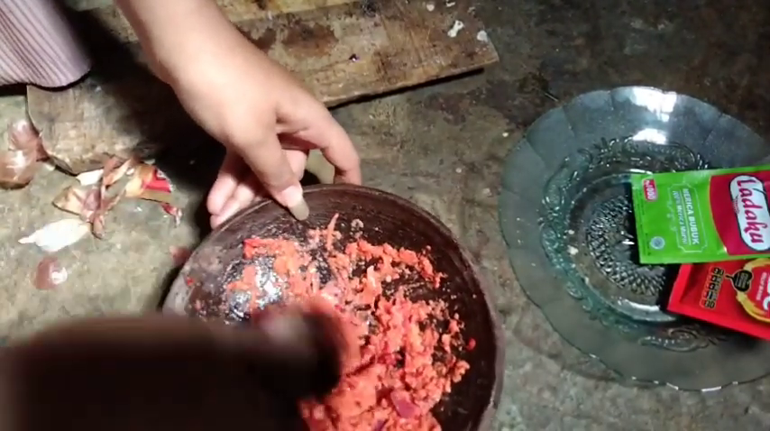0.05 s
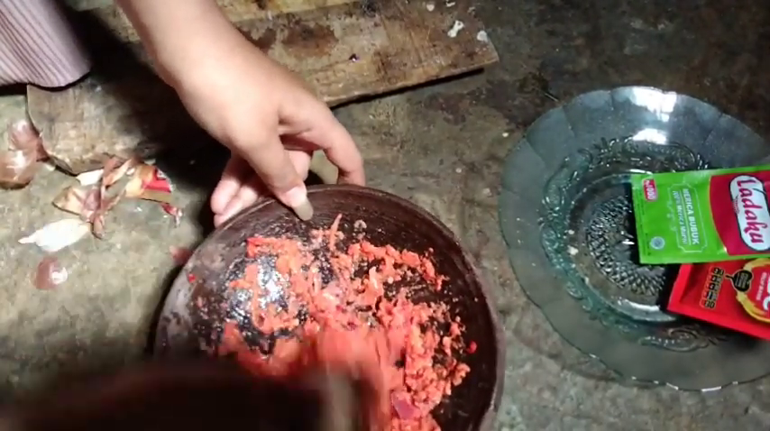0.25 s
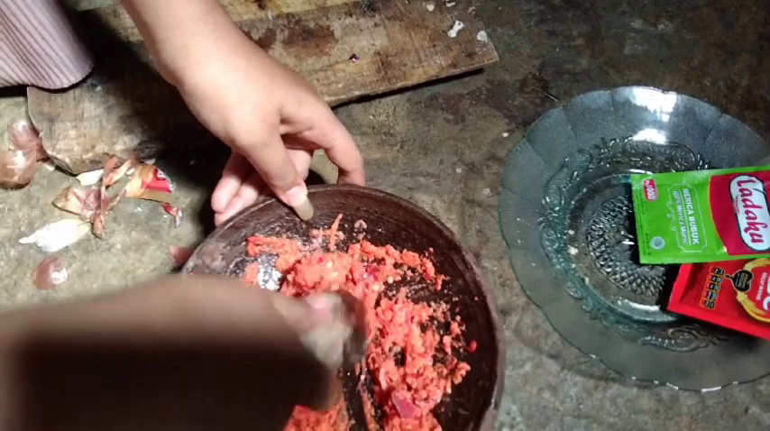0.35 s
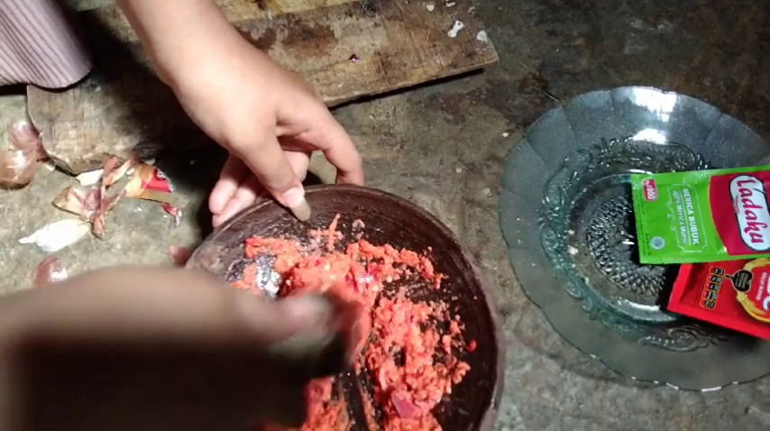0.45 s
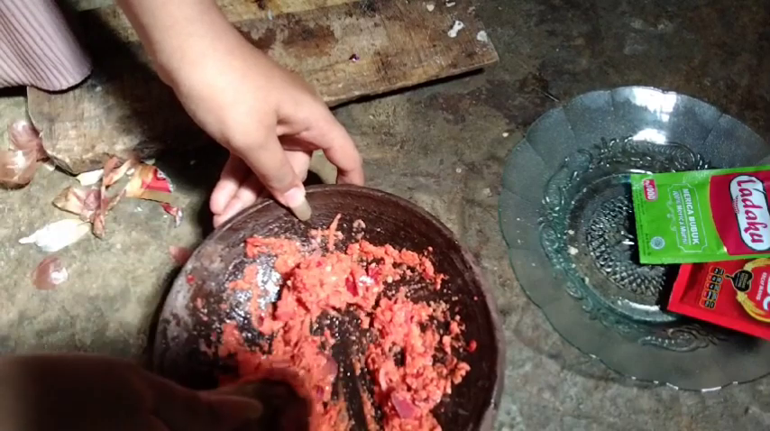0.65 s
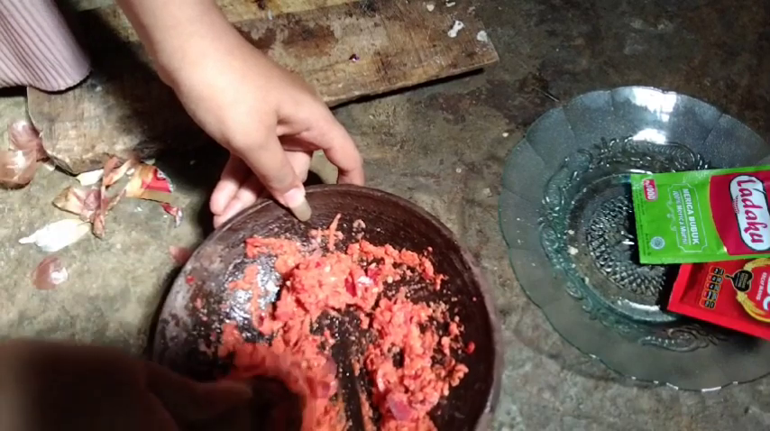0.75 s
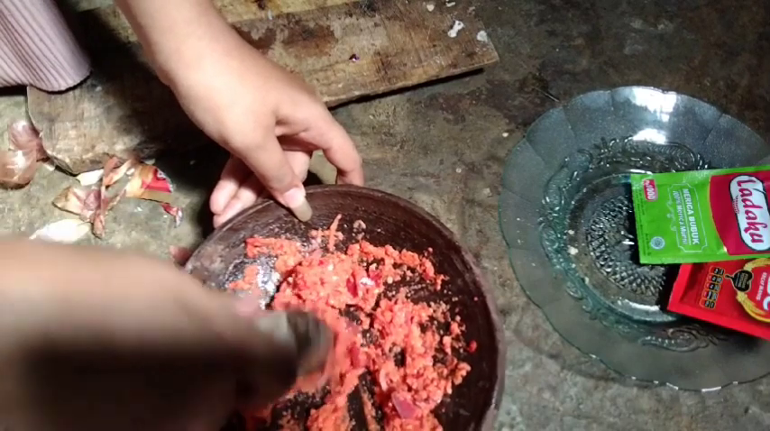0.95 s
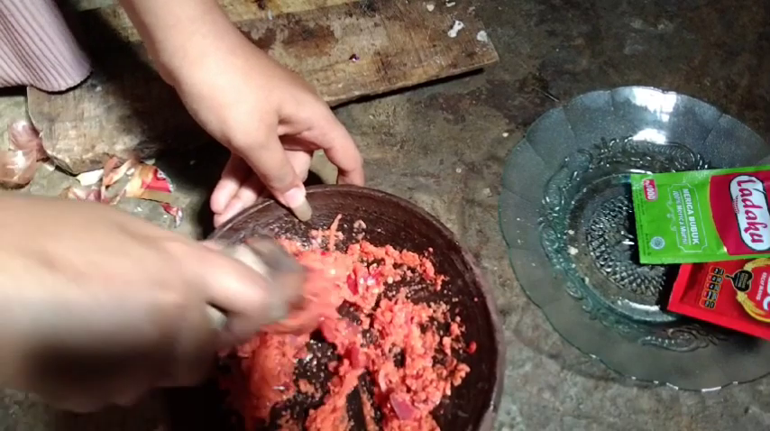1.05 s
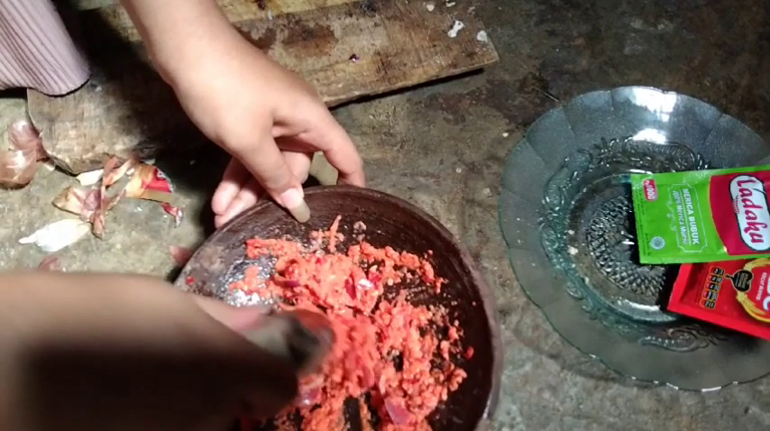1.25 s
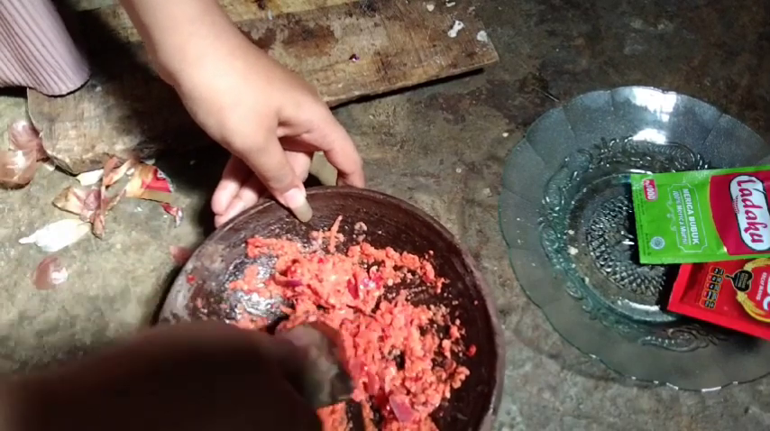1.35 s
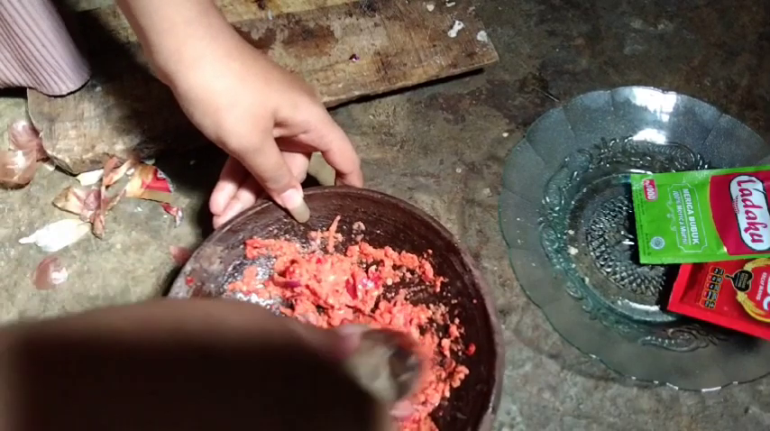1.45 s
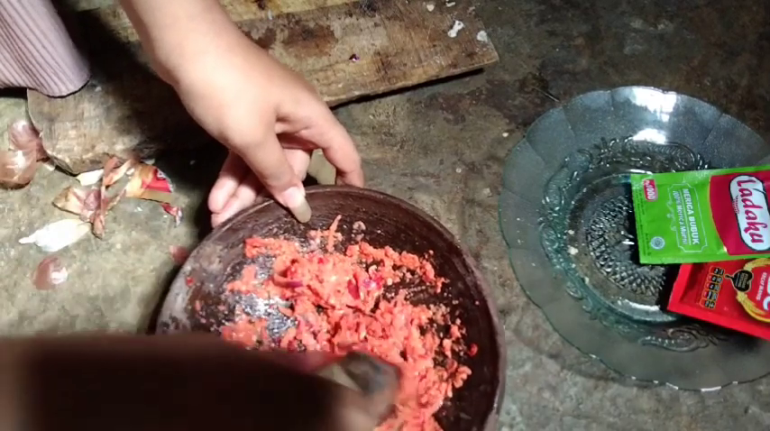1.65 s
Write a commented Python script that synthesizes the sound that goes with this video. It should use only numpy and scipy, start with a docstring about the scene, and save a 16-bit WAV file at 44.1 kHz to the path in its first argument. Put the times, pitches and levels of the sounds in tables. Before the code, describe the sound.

A stone pestle grinds wet chilli paste in a mortar: a small plop and squelch, a quick run of clacks, gritty scraping, then one heavy, dull knock. It is heard close up in a small kitchen.

```python
"""Pestle in wet chilli paste

Close by, a stone pestle squelches into a mortar and an air pocket plops. Stone clacks on the bowl
along the stroke, rubs back over seeds and skins, and lands one heavy blow, dulled by the paste.
Films of juice snap in tiny ticks, the mortar rocks on the kitchen floor with soft low bumps,
and the small hard room answers over a faint rumble."""
import sys
import numpy as np
from scipy import signal
from scipy.fft import rfft, irfft, next_fast_len
from scipy.io import wavfile
from scipy.ndimage import uniform_filter1d

SR = 44100
rng = np.random.default_rng(int(sys.argv[2]) if len(sys.argv) > 2 else 0)


def pcm_store(signal):
    """Save signal as 16-bit PCM."""
    levels = np.round(np.clip(np.atleast_2d(signal), -1, 1) * 32767)
    wavfile.write(sys.argv[1], SR, levels.astype(np.int16).T)


N = 74970
T = np.arange(N) / SR


def amp(db):
    return 10 ** (np.asarray(db) / 20)


def unit_rms(x):
    return x / np.sqrt(np.mean(x ** 2) + 1e-20)


def curve_at(points, hz):
    """Read a curve of (Hz, value) points along a log frequency axis."""
    freqs, values = np.transpose(points)
    return np.interp(np.log(hz + 1), np.log(freqs + 1), values)


def coloured(x, eq):
    """Shape x with an EQ of (Hz, dB) points; minimum phase, so nothing rings ahead of an attack."""
    size = 2 * next_fast_len(len(x))
    gain = amp(curve_at(eq, np.fft.rfftfreq(size, 1 / SR)))
    cepstrum = irfft(np.log(gain), size)
    cepstrum[1:size // 2] *= 2
    cepstrum[size // 2 + 1:] = 0
    return irfft(rfft(x, size) * np.exp(rfft(cepstrum)), size)[:len(x)]


def evened(x, width_hz=350):
    """Flatten the peaks and gaps in the spectrum that are broader than width_hz."""
    size = next_fast_len(len(x))
    power = np.abs(uniform_filter1d(np.abs(rfft(x, size)) ** 2, round(width_hz * size / SR)))
    gain_db = -10 * np.log10(power / power.mean())
    return coloured(x, np.transpose([np.fft.rfftfreq(size, 1 / SR), gain_db]))


def at(start, x):
    """Delay x to its start in seconds."""
    return np.pad(x, (max(round(start * SR), 0), 0))[:N]


def ping(hz, rise_s):
    """A heavily damped mode that swells for rise_s and dies within a few cycles."""
    t = T[T < 10 * rise_s]
    envelope = (t / rise_s * np.exp(1 - t / rise_s)) ** 4
    return np.pad(envelope * np.sin(2 * np.pi * hz * (t - rise_s)), (0, N - len(t)))


# The kitchen's reverb time. Each row: frequency in Hz, seconds to fall by 60 dB.
ROOM_DECAY = [(150, 0.39), (400, 0.32), (1000, 0.33), (3000, 0.28), (7000, 0.27), (15000, 0.18)]
# Its standing waves. Each row: pitch in Hz, level in dB.
ROOM_MODES = [(149, -57.5), (176, -64), (216, -65)]


def in_room(x, send_db):
    """Add the kitchen: dense early reflections, a tail whose treble dies first, low standing waves."""
    first_wall_s, early_decay_s, boom_t60_s = 0.0016, 0.0053, 0.86
    hz, frame_s, spectra = signal.stft(rng.standard_normal(SR * 3 // 4), SR, nperseg=256)
    decay = amp(-60 * frame_s / curve_at(ROOM_DECAY, hz)[:, None])
    tail = signal.istft(spectra * decay, SR, nperseg=256)[1]
    t = T[:len(tail)]
    early_lift = 1 + amp(-1) * np.exp(-t / early_decay_s)
    tail = tail * early_lift * (t > first_wall_s)
    modes = sum(amp(db) * np.sin(2 * np.pi * pitch * t) for pitch, db in ROOM_MODES)
    boom = modes * amp(-60 * t / boom_t60_s)
    direct = t == 0
    response = evened(direct + amp(send_db) * tail / np.linalg.norm(tail)) + amp(send_db) * boom
    return signal.fftconvolve(x, response)[:N]


# Tone of the room's rumble. Each row: frequency in Hz, gain in dB.
RUMBLE_EQ = [(25, 11), (60, 12.5), (110, 9), (170, 11.5), (300, 2), (600, -17.5), (1300, -22.5),
             (2500, -30), (6000, -28), (10000, -49), (15000, -41)]
# Tone of the midrange rush. Each row: frequency in Hz, gain in dB.
RUSH_EQ = [(150, -18.5), (330, 2), (500, 2.5), (800, -4), (1300, -0.5), (2000, -15), (6000, -26)]
# Fader ride on the rush. Each row: time in seconds, level in dB.
RUSH_FADER = [(0, -60.5), (.19, -90), (.4, -60.5), (.95, -64), (1.45, -72.5), (1.7, -73)]


def room_tone():
    """A steady low rumble under a faint midrange rush that swells and sinks."""
    fader = amp(np.interp(T, *np.transpose(RUSH_FADER)))
    rush = fader * unit_rms(coloured(rng.standard_normal(N), RUSH_EQ))
    rumble = amp(-63) * unit_rms(coloured(rng.standard_normal(N), RUMBLE_EQ))
    return rumble + rush


# The mortar's foot on the floor. Each row: start in seconds, level in dB, pitch in Hz.
FOOT_BUMPS = [(0.018, -39.5, 200), (.066, -46.5, 197), (0.244, -45, 213), (0.327, -44, 220),
              (0.367, -44, 246), (0.792, -47, 212), (1.145, -43.5, 169), (1.21, -42, 169),
              (1.397, -53, 159), (1.521, -56, 325)]


def rocking():
    """The mortar rocks and its foot meets the floor in soft low bumps."""
    return sum(amp(db) * at(start, in_room(ping(hz, rise_s=0.00668), send_db=-1))
               for start, db, hz in FOOT_BUMPS)


def friction(strokes, eq, grains_per_s, smear_db):
    """Paste under sliding stone: dense grains over a wet smear, swelling with each stroke."""
    swells = [amp(db) * np.exp(-np.maximum((peak - T) / rise, (T - peak) / fall))
              for peak, db, rise, fall in strokes]
    force = np.sqrt(sum(swell ** 2 for swell in swells))
    sizes_db = 5.5 * np.clip(rng.standard_normal(N), -2, 2)
    clicks = amp(sizes_db) * rng.choice([-1, 1], N)
    grains = unit_rms(clicks * (rng.random(N) < grains_per_s / SR))
    smear = amp(smear_db) * rng.standard_normal(N)
    return in_room(force * unit_rms(coloured(grains + smear, eq)), send_db=-4)


# Rubbing strokes. Each row: peak time in seconds, level in dB, rise and fall in seconds.
RUB_STROKES = [(.015, -63.5, 0.0075, 0.048), (.226, -46, 0.00099, 0.065), (.26, -72, .009, 0.21),
               (.35, -45, 0.033, 0.015), (.475, -56, 0.01, 0.14), (.86, -43.5, 0.016, 0.022),
               (.882, -41.5, 0.0041, 0.01), (1.0, -63, 0.023, 0.0312), (1.27, -56, 0.061, 0.062),
               (1.313, -54, 0.02, 0.016), (1.605, -58.5, 0.0046, 0.016)]
# Gritty tone of the rub. Each row: frequency in Hz, gain in dB.
RUB_EQ = [(100, -14), (300, -2.5), (700, -3), (1300, 2), (1900, -4.5), (3000, 4), (4300, -4), (6200, -7),
          (7800, -10), (10000, -22.5), (12500, -23.5), (15000, -18.5)]


def rubbing():
    """The pestle scrapes over seeds and skins."""
    return friction(RUB_STROKES, RUB_EQ, grains_per_s=1000, smear_db=-7)


# Squeezes of juice. Each row: peak time in seconds, level in dB, rise and fall in seconds.
SQUISHES = [(.471, -49.5, .001, 0.029), (.882, -70, 0.0091, .012), (1.613, -65, 0.023, 0.042)]
# Bright, wet tone of the juice. Each row: frequency in Hz, gain in dB.
JUICE_EQ = [(500, -25.5), (2500, -7), (4000, 4), (5500, -11), (10000, -4), (15000, 3.5)]


def squishing():
    """Juice squeezes out from under the pestle in a fine crackle."""
    return friction(SQUISHES, JUICE_EQ, grains_per_s=300, smear_db=-8.5)


# Sticky ticks in the paste. Each row: start in seconds, level in dB, bubble pitch in Hz.
WET_TICKS = [(0.2252, -35, 4800), (0.3665, -30.5, 7000), (0.4709, -23, 3800), (0.777, -60, 10100),
             (0.986, -54, 7680), (1.0027, -45, 6850), (1.0152, -45, 6180), (1.0272, -51.5, 7460),
             (1.4646, -53.5, 6360), (1.5797, -48, 6860)]


def wet_ticks():
    """A film of juice snaps and its bubble rings for a few cycles."""
    rise_cycles = 2.2
    snap = amp(-3) * coloured(1.0 * (T == 0), JUICE_EQ)
    ticks = sum(amp(db) * at(start, snap + ping(hz, rise_cycles / hz)) for start, db, hz in WET_TICKS)
    return in_room(ticks, send_db=-4.5)


# Modes of the air pocket. Each row: pitch in Hz, relative level in dB, rise in seconds.
PLOP_MODES = [(700, -5, 0.0041), (480, -10, 0.0013), (1533, -8.5, .0018), (2540, -8, 0.00065)]


def plop():
    """An air pocket pops in the paste with one hollow note."""
    start = 0.2465
    pop = sum(amp(db) * ping(hz, rise) for hz, db, rise in PLOP_MODES)
    return in_room(amp(-18.5) * at(start, pop), send_db=-5.5)


# Pestle against bowl. Each row: start in seconds, level in dB, clack and bowl pitches in Hz,
# then bowl, rim, overtone and grit trims in dB, and room send in dB.
KNOCKS = [(0.3674, -13, 2810, 1400, -5, -21, -27.5, -32.5, 1.5),
          (0.4699, -21, 2480, 1545, -8.5, -27, -38, -26, 1),
          (0.5184, -5, 3140, 1294, -28.5, -40, -12, -31, -3.5),
          (0.6172, -15, 2850, 1210, -16.5, -14, -42, -29.5, -0.5),
          (.6732, -14, 3030, 1160, -19.5, -50, -17.5, -29.5, -1.5),
          (0.7031, -14, 3150, 1166, -24, -43, -13.5, -32, -2),
          (0.7329, -23.5, 3020, 1260, -24.5, -25, -37, -35, -6),
          (0.945, -33, 2860, 1280, -15, -30, -18, -36.5, 1.5),
          (0.967, -34.5, 2920, 1300, -20.5, -17, -39.5, -35, 0),
          (1.059, -44, 2670, 1250, -6, -22.5, -33.5, -35.5, 2),
          (1.309, -39.5, 2690, 1320, -9, -21, -4.5, -8, -4),
          (1.6022, -50.5, 2780, 1785, -6, -8.5, 5.5, -10.5, -0.5)]
# Tone of grains crushed at the contact. Each row: frequency in Hz, gain in dB.
GRIT_EQ = [(100, -4.5), (400, 12.5), (1000, 17), (2000, -9), (4500, 24), (9000, 0.5), (15000, -14)]
# How the bowl radiates. Each row: frequency in Hz, gain in dB.
BOWL_EQ = [(1330, -0.5), (3500, -.5), (4700, -7.5), (6800, -1.5), (10000, -1)]


def knocks():
    """Stone on the bowl: a clack pitched by the contact, lower bowl and rim notes, a crack of grit."""
    out = np.zeros(N)
    grit_decay_s = 0.0022
    body = amp(-39) * ping(hz=450, rise_s=0.00021)
    rim = ping(hz=2060, rise_s=0.0011)
    overtone = ping(hz=6670, rise_s=0.00046)
    for start, db, clack_hz, bowl_hz, bowl_db, rim_db, overtone_db, grit_db, send_db in KNOCKS:
        clack = ping(clack_hz, rise_s=0.00072) + amp(overtone_db) * overtone
        bowl = amp(bowl_db) * ping(bowl_hz, rise_s=0.0012) + amp(rim_db) * rim
        grit = amp(grit_db) * coloured(rng.standard_normal(N) * np.exp(-T / grit_decay_s), GRIT_EQ)
        out += amp(db) * at(start, in_room(clack + body + bowl + grit, send_db))
    return coloured(out, BOWL_EQ)


# A light blow, then the heavy one. Each row: start in seconds, level in dB, room send in dB.
BLOWS = [(0.3672, -13, 6), (1.1447, 4.5, -6.5)]
# Tone of a blow through paste. Each row: frequency in Hz, gain in dB.
THUD_EQ = [(90, -12), (300, -10.5), (600, -2.5), (1150, 2.5), (1850, 3), (2900, -9.5), (3900, -3),
           (6200, -15), (10000, -25), (15000, -31.5)]


def blows():
    """The pestle lands mid-bowl, cushioned by the paste it crushes, and wakes the mortar's low note."""
    out = np.zeros(N)
    crush_decay_s = 0.002
    impact = T == 0
    low_note = amp(-30) * ping(hz=434, rise_s=0.0036)
    for start, db, send_db in BLOWS:
        crush = amp(-16) * rng.standard_normal(N) * np.exp(-T / crush_decay_s)
        thud = coloured(evened(impact + crush), THUD_EQ)
        out += amp(db) * at(start, in_room(thud / np.linalg.norm(thud) + low_note, send_db))
    return out


def scene():
    """The mono mix of pestle, paste, mortar and room."""
    sliding = rubbing() + squishing()
    return (sliding + knocks() + blows() + plop() + wet_ticks() + rocking() + room_tone())[None]


def record(dry):
    """A low cut thins the deep bass and a steep high cut takes off the very top."""
    low_cut_hz, high_cut_hz, edge_hz = 123, 15500, 300
    thinned = signal.sosfilt(signal.butter(2, low_cut_hz, "high", fs=SR, output="sos"), dry)
    size = 2 * next_fast_len(N)
    high_cut = np.clip((high_cut_hz - np.fft.rfftfreq(size, 1 / SR)) / edge_hz + 0.5, 0, 1)
    return irfft(rfft(thinned, size) * high_cut, size)[..., :N]


dry = scene()
out = record(dry)
pcm_store(out)
```